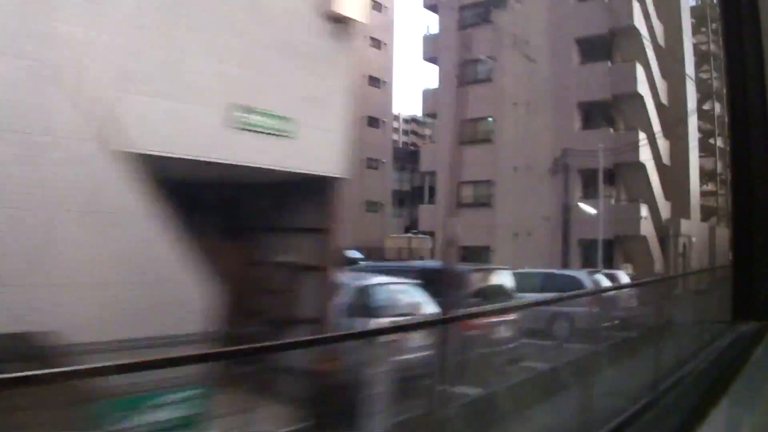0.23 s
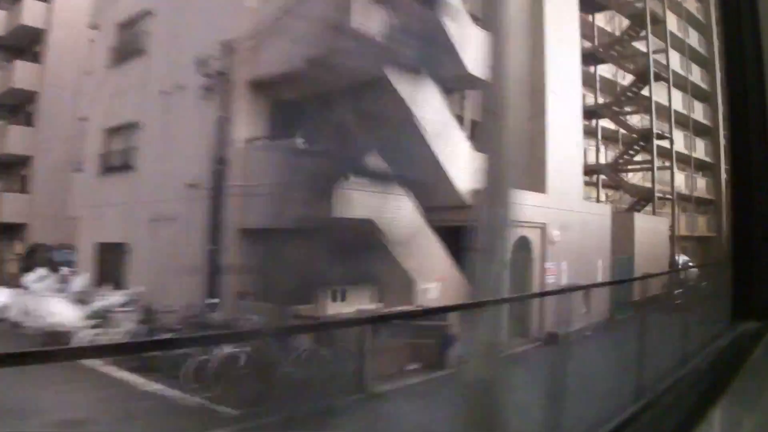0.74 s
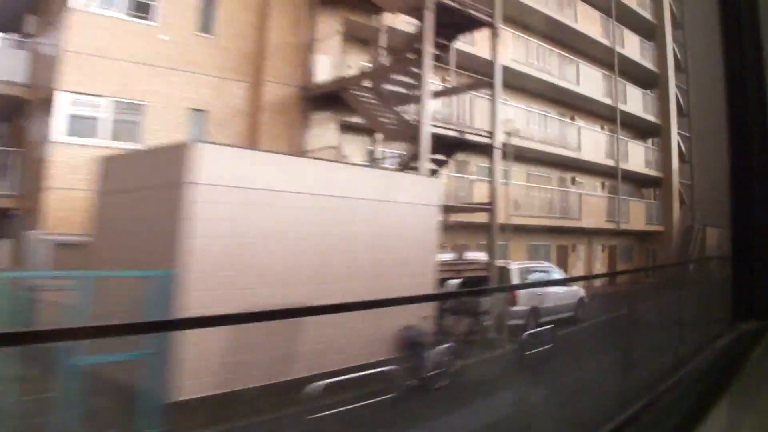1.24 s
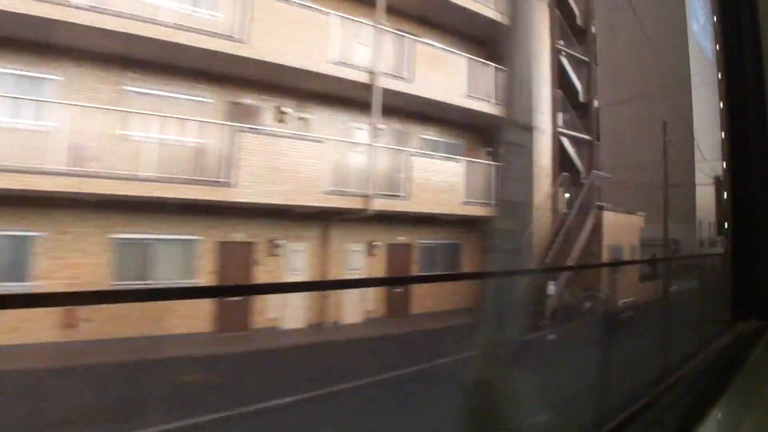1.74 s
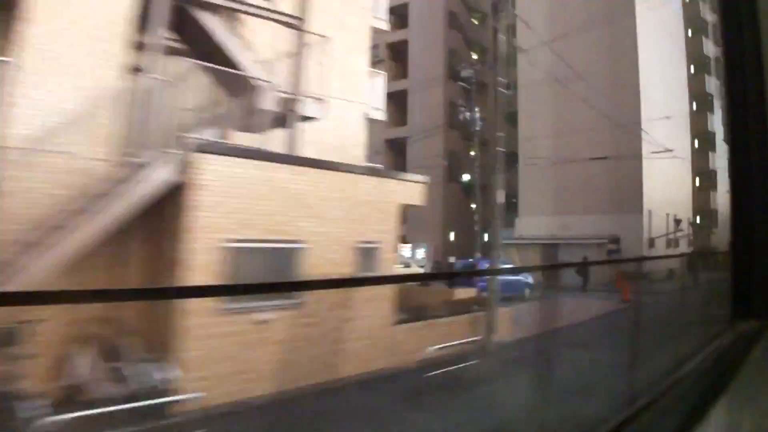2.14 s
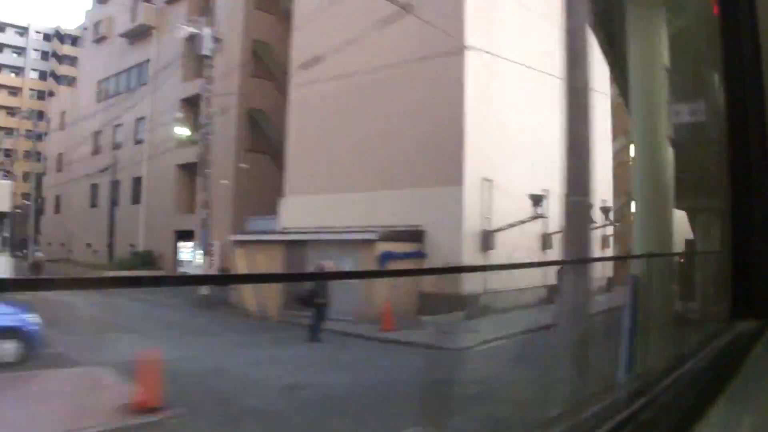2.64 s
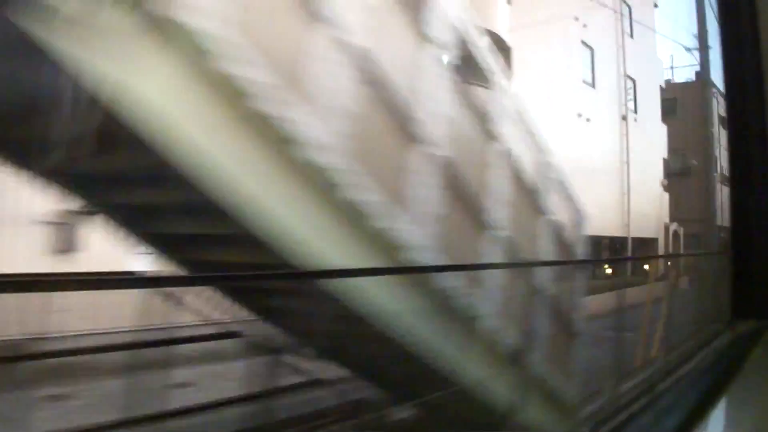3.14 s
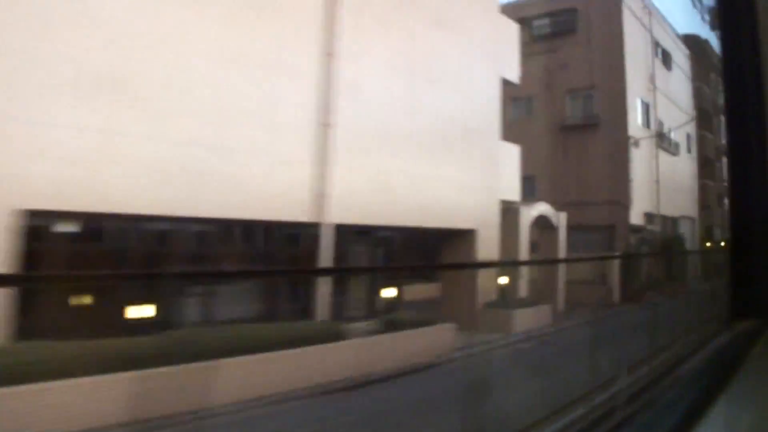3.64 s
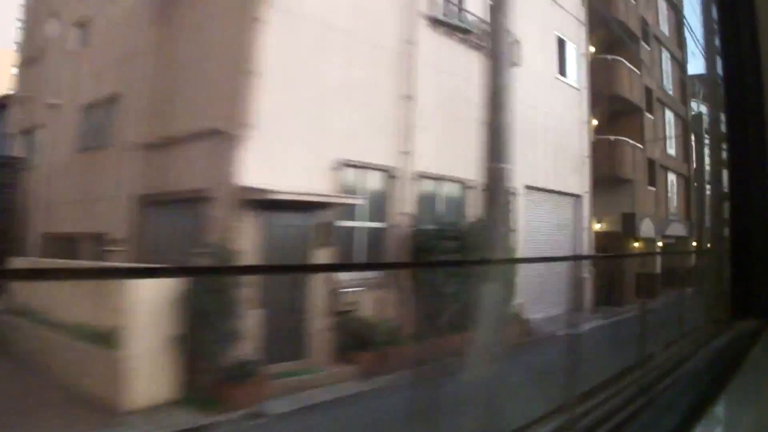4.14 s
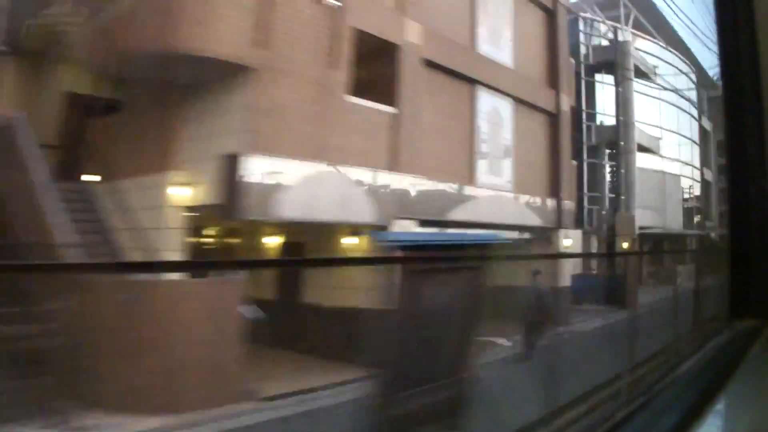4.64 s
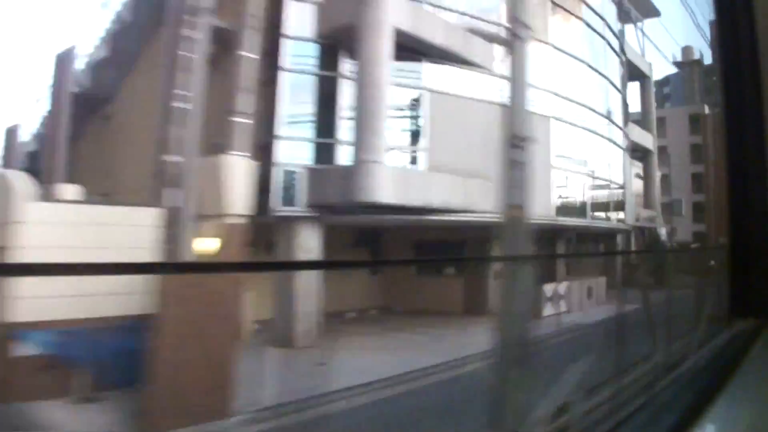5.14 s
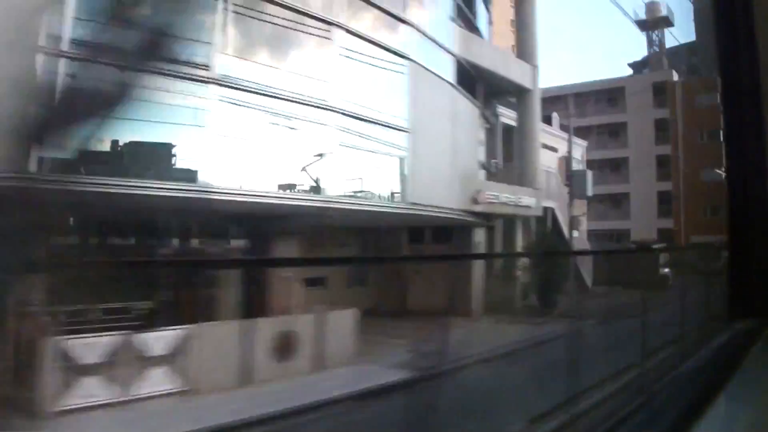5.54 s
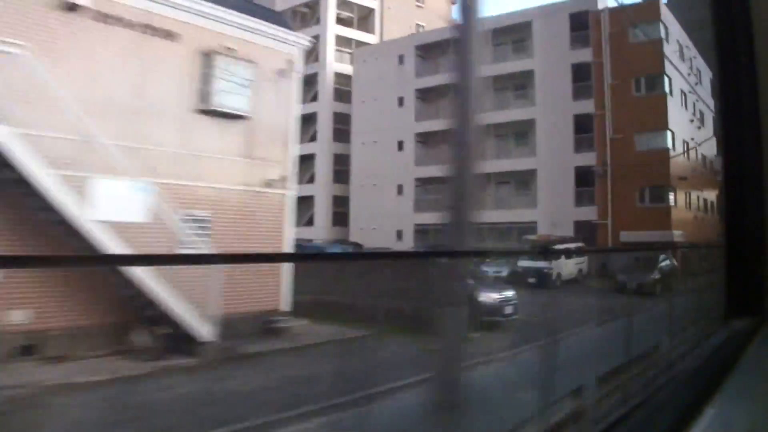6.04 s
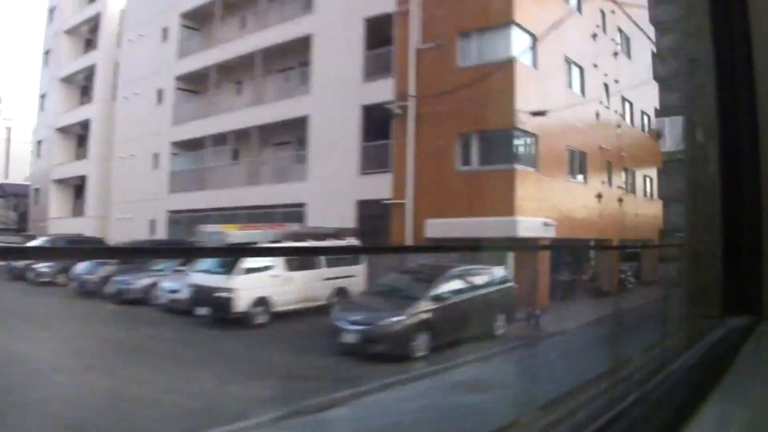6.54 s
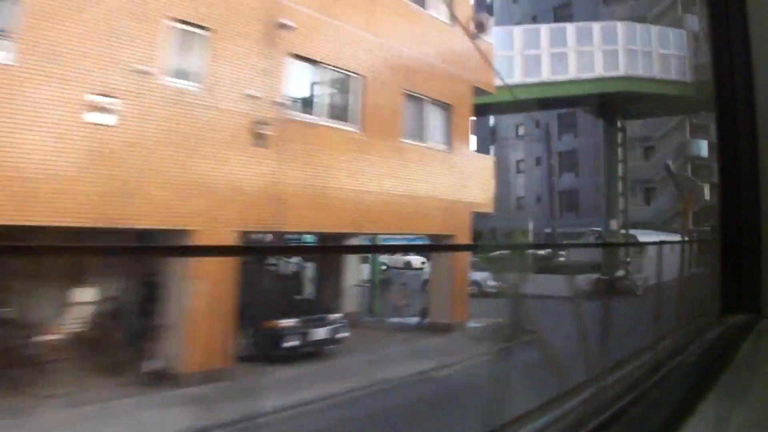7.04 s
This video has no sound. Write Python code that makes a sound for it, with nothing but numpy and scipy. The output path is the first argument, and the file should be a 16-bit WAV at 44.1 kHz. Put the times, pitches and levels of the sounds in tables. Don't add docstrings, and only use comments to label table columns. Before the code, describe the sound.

Heard inside an electric train car by a stereo microphone at the window: a deep continuous wheel rumble with a low wavering motor hum and faint air hiss. Soft, dull rail-joint knocks pass underneath. After about six seconds the roar grows, loose trim and a door latch rattle, and heavy blows ring the floor just before the end.

```python
import sys
import numpy as np
from scipy import signal
from scipy.fft import rfft, irfft, next_fast_len
from scipy.io import wavfile
from scipy.ndimage import uniform_filter1d

SR = 44100
rng = np.random.default_rng(int(sys.argv[2]) if len(sys.argv) > 2 else 0)


def decibels_to_gain(level_db):
    exponent = np.asarray(level_db, float) / 20
    return 10 ** exponent


def materialize(psi):
    bounded = np.clip(np.atleast_2d(psi).T, -1, 1)
    quanta = np.round(bounded * 32767).astype(np.int16)
    wavfile.write(sys.argv[1], SR, quanta)


N = 321489
TIME = np.arange(N) / SR
SIDES = np.array([[.5], [-.5]])  # left, right; times a left-minus-right dB

# f/Hz, side minus mid/dB
WIDTH_DB = [(20, -6.5), (90, -5), (140, -6.5), (250, -4.5), (500, -9.5), (1200, -8.5), (2000, -7.5),
            (3500, -2), (8000, -0.5)]
# f/Hz, left minus right/dB
BALANCE_DB = [(20, -2.5), (100, -1.5), (250, -0.5), (450, -0.5), (900, -2), (2000, 1.5), (4000, 0),
              (8000, -0.5)]
# f/Hz, density/dB
AIR_DB = [(2500, -15.5), (4500, -5), (7000, -3), (10000, -3), (13000, -5.5), (16000, -9.5)]
# t/s, peak level/dB, half length/s
RUSTLE = [(.08, -76, 0.03), (.9, -89.5, 0.042), (1.9, -83, 0.043), (2.8, -72, .08), (3.65, -76.5, 0.053),
          (4.15, -77, .08), (4.38, -75, .045), (4.7, -78.5, 0.065), (4.9, -76.5, .05), (5.35, -82.5, 0.087),
          (5.71, -70, 0.035), (5.78, -66, 0.045), (5.85, -72.5, .025), (6.0, -72, 0.07), (6.32, -72, 0.05),
          (6.7, -73.5, .045), (7.21, -71.5, 0.059)]
# t/s, level/dB, f/Hz, t60/s
FRAME = [(1.12, -47, 10530, 0.013), (1.847, -53.5, 10000, .012), (1.902, -58.5, 10500, 0.012),
         (1.921, -61.5, 10500, .012), (2.292, -53.5, 10950, .013), (5.569, -56, 11000, .012),
         (5.69, -57, 10070, .025), (6.045, -62, 10600, .05), (6.21, -63, 7970, .033),
         (6.701, -46, 10480, 0.027), (7.246, -61.5, 10000, 0.017), (7.26, -65.5, 12100, .015)]
# t/s, level/dB, f/Hz, t60/s
STRAP = [(2.803, -61, 7050, .02), (5.794, -60, 10000, 0.033), (5.804, -51.5, 9500, .04),
         (6.706, -52.5, 9460, 0.088), (6.722, -55, 10500, .06), (6.54, -59, 11000, 0.02),
         (6.327, -42, 8020, 0.067), (6.335, -52.5, 8520, .09), (6.346, -56, 9500, .07),
         (6.945, -61, 7470, 0.18), (7.097, -42.5, 8510, 0.027), (7.109, -47, 10000, .03)]
# t/s, level/dB, f/Hz, t60/s
TONGUE = [(5.803, -42, 4650, .03), (6.533, -56, 4300, .045), (6.65, -55, 4350, .045),
          (6.708, -57, 3900, .03), (6.717, -56, 4600, .03), (6.328, -49, 9200, .03),
          (6.34, -54, 10000, .05), (5.805, -55, 10000, .03), (5.998, -54, 6100, .05),
          (5.998, -53, 7300, .04), (6.652, -58, 6000, .04), (6.72, -57, 6500, .04), (7.098, -50, 8600, .03),
          (6.701, -52, 12800, .02), (4.953, -60, 3750, .04)]
# t/s, level/dB, f/Hz, t60/s
DOOR = [(5.769, -54.5, 2200, .04), (5.804, -44.5, 2600, .035), (5.997, -51.5, 2800, 0.039),
        (6.122, -52.5, 1810, .04), (6.246, -52, 1900, .04), (6.275, -52, 2000, .04),
        (6.324, -47, 2400, .05), (6.54, -55.5, 2400, .04), (6.65, -55, 2794, 0.036),
        (6.831, -51, 1810, .06), (7.085, -52.5, 2000, .04), (7.104, -47.5, 2200, .05),
        (7.172, -52, 2000, .04)]
# t/s, level/dB, f/Hz, t60/s
LATCH = [(4.953, -55, 5300, 0.055), (5.652, -66, 5400, 0.03), (5.765, -59, 8400, .07),
         (5.803, -54, 4200, 0.03), (5.85, -53.5, 9500, 0.06), (5.997, -48, 6500, 0.04),
         (6.533, -55, 5000, 0.048), (6.65, -53.5, 5000, 0.054), (6.708, -54, 5530, 0.1),
         (6.755, -60.5, 4500, 0.036), (7.068, -59, 5430, 0.036)]
# f/Hz, width/Hz, level/dB
LATCH_RINGS = [(4430, 230, 7), (4760, 210, 2), (6040, 135, 0), (6640, 125, 0), (6990, 105, -1)]
# t/s, length/s, f/Hz, wobble/Hz, level/dB
SQUEAKS = [(1.871, .024, 9600, 80, -61), (1.869, 0.026, 11800, 60, -69), (2.135, 0.024, 11800, 60, -74),
           (2.328, 0.13, 1076, 27, -48), (3.838, 0.086, 1650, 45, -52), (4.335, .1, 4450, 6, -71),
           (4.36, .07, 4690, 12, -75), (4.46, .06, 4430, 12, -78), (1.348, .04, 3450, 15, -71),
           (1.361, .03, 3790, 15, -73), (4.952, .018, 3740, 60, -66), (4.72, .085, 8608, 10, -78),
           (4.824, .125, 8608, 10, -69), (4.70, .15, 15385, 25, -75), (4.893, .075, 15385, 10, -76),
           (7.172, .018, 9000, 150, -64), (7.188, .03, 8500, 150, -64), (7.212, .035, 9000, 200, -65),
           (7.175, .02, 12300, 150, -70), (1.845, .015, 6900, 60, -70)]
# t/s, rate/Hz
SHAFT_HZ = [
    (0, 77.84),
    (3.5, 77.48),
    (7.29, 77.0),
]
# order, level/dB, left minus right/dB, second motor share/1,
# time of cancellation left/s, right/s
SHAFT_ORDERS = [(1, -35, 5.5, 0.25, 1.4, 0.4), (2, -39, 0.5, 0.79, 1.2, 1.5),
                (4, -44.5, 3.5, 0.34, 0.3, 0.3), (5, -48.5, -5, 0.69, 2.5, 1.3),
                (6, -55.5, 2.5, 0.2, 2.4, 5.4), (7, -43, 1.5, 0.69, 1.93, 2.25)]
# t/s, slot tone level/dB, third harmonic level/dB
SLOT_DB = [(0, -76.5, -92.5), (.25, -76, -90), (.6, -68.5, -93), (.78, -72, -93), (.9, -81, -92),
           (1.2, -79, -92), (1.42, -72.5, -92), (1.6, -76, -92.5), (1.72, -85, -93), (1.95, -78, -95),
           (2.8, -79, -98), (4.4, -76.5, -99), (4.62, -73, -94), (4.8, -87, -88), (5.7, -79, -88),
           (6, -77.5, -96), (7.29, -79.5, -99.5)]
# t/s, level/dB
MESH_DB = [(0, 2.5), (.5, -0.5), (1, -0.5), (1.4, -2), (1.6, 3), (1.75, -0.5), (2.2, -2), (2.42, -6),
           (2.65, 1.5), (3.1, -2), (3.5, 2), (3.9, 2), (4.15, -5.5), (4.5, 3), (4.78, -4.5), (5.1, 1.5),
           (6.1, -0.5), (7.29, 4)]
# t/s, peak level/dB, half length/s
HUM_SWELLS = [(0, -25, 0.041), (.43, -23, 0.22), (1.5, -30.5, 0.46), (1.98, -26, 0.16),
              (2.38, -21.5, 0.055), (2.64, -26, 0.087), (3.37, -25.5, 0.12), (3.64, -30, 0.043),
              (4.02, -26.5, 0.066), (4.44, -21.5, .1), (4.64, -27, 0.1), (4.85, -26, 0.057),
              (5.12, -22.5, 0.071), (5.5, -28, 0.096), (5.85, -25.5, 0.17), (6.08, -17.5, 0.022),
              (6.51, -13.5, 0.043), (6.65, -21.5, 0.071), (7.07, -15, 0.055), (7.25, -23, 0.094)]
# t/s, peak level/dB, half length/s
PANEL_SWELLS = [(0, -40, 0.018), (.5, -43, .1), (.72, -28, 0.0094), (.97, -42.5, 0.11), (1.13, -27, 0.015),
                (1.28, -26, 0.015), (1.43, -30, 0.046), (1.55, -27, 0.067), (1.83, -25.5, 0.077),
                (2.24, -34, 0.087), (2.55, -32.5, 0.057), (2.71, -26, 0.055), (3.17, -32, 0.062),
                (3.51, -28.5, 0.032), (3.66, -31.5, 0.044), (4.24, -27, 0.071), (4.7, -39, 0.11),
                (4.97, -31.5, 0.049), (5.46, -27.5, 0.056), (5.81, -27.5, 0.051), (6.15, -31.5, 0.061),
                (6.29, -31.5, 0.067), (6.49, -31.5, 0.054), (6.6, -24, 0.026), (6.83, -28, 0.028),
                (7.17, -35, 0.091)]
# t/s, level/dB, centre f/Hz, width/octaves,
# t60/s
JOINTS = [(.07, -31.5, 401.5, 0.23, 0.36), (.83, -35, 300.5, 1.5, 0.25), (1.53, -32.5, 305, 1.8, 0.12),
          (2.29, -28, 350, 0.82, 0.45), (2.8, -27.5, 257, 0.85, 0.31), (2.7, -65, 4200, 1.2, .45),
          (2.8, -63.5, 4200, 1.2, .4), (3.17, -26.5, 151, 0.46, .4), (3.12, -21, 256, 0.81, 0.46),
          (3.15, -37.5, 523, 0.36, 0.19), (3.33, -37, 287, 0.48, .3), (3.99, -32, 353, 0.59, 0.35),
          (4.769, -26.5, 331, 0.95, 0.18), (4.8, -26, 206, 0.16, 0.48), (6.27, -29, 189.4, 0.22, 0.49),
          (6.66, -28.5, 203.6, 0.24, 0.48), (6.85, -26.5, 303, .15, .4), (1.571, -36, 163, 0.18, .3),
          (3.97, -33, 250, .15, .3), (2.525, -36, 605, 0.81, .08), (6.615, -40, 554, 0.91, 0.093),
          (7.031, -30, 484, 0.79, 0.088), (5.47, -27.5, 375, 0.69, 0.49), (6.04, -28, 393, 0.24, 0.45),
          (6.386, -34, 500, 0.5, 0.2), (6.795, -32.5, 475, 1.5, 0.28), (7.087, -17.5, 294.5, 0.93, 0.27),
          (7.10, -26, 572, 0.41, .4), (7.122, -25, 271, 0.35, 0.45), (7.26, -30.5, 219.5, 1.2, 0.18)]
# t/s, level/dB, f/Hz,
# t60/s
BLOWS = [
    (6.386, -24, 539, .25),
    (7.022, -11, 48, .08),
    (7.097, -7, 295, .1),
    (7.095, -24, 548, .3),
    (7.1, -20, 352, .25),
    (7.131, -10, 280, .12),
    (7.2868, -6.5, 105, .1),
]
# f/Hz, density/dB per Hz
CAR_DB = [(5, -0.5), (13, 4.5), (33, -0.5), (70, -0.5), (150, -6.5), (270, -13), (420, -17), (510, -22.5),
          (640, -23.5), (780, -27.5), (1000, -31), (2000, -36.5), (2500, -45), (3200, -49), (4000, -54.6),
          (6300, -64.6), (10000, -75.5)]
# t/s, level over plain line/dB
TRACK_DB = [(0, 0), (.1, 1), (.6, -0.5), (1.4, -0.5), (1.6, 1.5), (2.2, 0), (2.9, 0), (3.2, 2.5), (3.6, 0),
            (4.5, -0.5), (4.85, 0.5), (5.35, 0), (5.95, 2.5), (6.1, 5.5), (6.4, 6.5), (6.9, 7), (7.11, 6),
            (7.29, 6.5)]
# t/s, level over steady sway/dB, half length/s
LURCHES = [(.12, 0, 0.023), (1.38, 0.5, .06), (2.31, -4, 0.13), (2.85, 4, 0.086), (3.33, 10, 0.058),
           (4.61, -14.5, 0.025), (5.16, 5, 0.033), (5.93, 2, 0.16), (6.06, 9.5, 0.023), (6.36, 1.5, 0.052),
           (6.62, 1.5, 0.081), (7.0, 0, 0.059), (7.2, -19, 0.04)]
REGISTER_HZ = [
    25,
    130,
    400,
    1500,
]
REGISTER_FEELS = [
    1.02,
    0.53,
    1.44,
    0.17,
]


def unit(x):
    return x / np.sqrt(np.mean(x ** 2))


def over_time(table):
    s, *columns = np.transpose(table)
    return np.array([np.interp(TIME, s, c) for c in columns])


def over_hz(table, hz):
    table_hz, db = np.transpose(table)
    return np.interp(np.log(hz), np.log(table_hz), db)


def walk(rate_hz):
    hold = int(SR / rate_hz)
    steps = np.repeat(rng.standard_normal(N // hold + 1), hold)
    return unit(uniform_filter1d(uniform_filter1d(steps, hold), hold)[:N])


def swells(rows):
    return sum(decibels_to_gain(db) * np.exp(-.5 * ((TIME - s) / half_s) ** 2) for s, db, half_s in rows)


def tone(hz):
    return np.sin(2 * np.pi * np.cumsum(hz) / SR)


def field(spectrum, level_db, flicker_db, rate_hz):
    size = next_fast_len(N)
    hz = np.maximum(np.arange(size // 2 + 1) * SR / size, 1)
    mid, side = rfft(rng.standard_normal((2, size))) * decibels_to_gain(over_hz(spectrum, hz))
    side = side * decibels_to_gain(over_hz(WIDTH_DB, hz))
    pair = np.array([mid + side, mid - side]) * decibels_to_gain(SIDES * over_hz(BALANCE_DB, hz))
    low_hz, high_hz = spectrum[0][0], spectrum[-1][0]
    out = 0
    for centre_hz in 2 ** np.arange(np.log2(low_hz), np.log2(high_hz) + .5, .5):
        share = np.clip(1 - 2 * abs(np.log2(hz / centre_hz)), 0, 1)
        gain = decibels_to_gain(level_db(centre_hz) + flicker_db * walk(rate_hz))
        out = out + irfft(pair * share, size)[:, :N] * gain
    return out


def burst(s, db, hz, octaves, t60_s, pan_db, rise_s, alike, order=2):
    t = np.arange(int(t60_s * SR) + 64) / SR
    edges_hz = np.minimum(hz * 2 ** (np.array([-.5, .5]) * octaves), [15000, 20000])
    band = signal.butter(order, edges_hz, "band", fs=SR, output="sos")
    mid, side = signal.sosfilt(band, rng.standard_normal((2, SR // 2)))[:, :len(t)]
    pair = unit(mid + 2 * SIDES * (1 - alike) * side)
    shape = (1 - np.exp(-t / rise_s)) * 1000 ** (-t / t60_s)
    knock = pair * shape * decibels_to_gain(db + SIDES * pan_db)
    return np.pad(knock, ((0, 0), (int(s * SR), N)))[:, :N]


def air():
    hiss = unit(field(AIR_DB, lambda hz: 0, flicker_db=0.7, rate_hz=26))
    steady = hiss * decibels_to_gain(-77.5 + 0.49 * over_time(TRACK_DB)[0])
    dull = signal.lfilter(*signal.butter(1, 7100, fs=SR), hiss)
    cloth = dull * swells(RUSTLE) * decibels_to_gain(4 + 2.0 * walk(50))
    return decibels_to_gain(5.0) * (steady + cloth)


def rattle(ticks, octaves, pan_db, order, alike):
    return sum(burst(s, db, hz, octaves, t60_s, pan_db, 0.028 * t60_s, alike, order)
               for s, db, hz, t60_s in ticks)


def squeaks():
    out = 0
    for s, length_s, hz, wobble_hz, db in SQUEAKS:
        gate = np.clip(np.minimum(TIME - s, s + length_s - TIME) / (0.19 * length_s), 0, 1)
        out = out + gate * decibels_to_gain(db + 3.2 * walk(60)) * tone(hz + wobble_hz * walk(60))
    return out


def trim():
    out = rattle(FRAME, octaves=.6, pan_db=7.5, order=1, alike=.15)
    out = out + rattle(STRAP, octaves=.9, pan_db=2.5, order=1, alike=.1)
    out = out + rattle(TONGUE, octaves=.1, pan_db=-3, order=2, alike=.7)
    out = out + rattle(DOOR, octaves=1.2, pan_db=1.5, order=2, alike=.55)
    latch = rattle(LATCH, octaves=1.3, pan_db=-9, order=2, alike=.45)
    out = out + latch
    for hz, width_hz, db in LATCH_RINGS:
        out = out + decibels_to_gain(db) * signal.lfilter(*signal.iirpeak(hz, hz / width_hz, SR), latch)
    return out + squeaks()


def motors():
    slip_hz, mesh_order = 0.054, 7
    turns = np.cumsum(over_time(SHAFT_HZ)[0] + 0.038 * walk(3)) / SR
    inverter = decibels_to_gain(-61.5 + 1.4 * walk(15)) * np.sin(2 * np.pi * 1281.5 * TIME)
    slot_db = over_time(SLOT_DB) + np.array([1.5 * walk(5.9), 4.0 * walk(25)])
    slot_turns = turns + np.cumsum(.025 * walk(9)) / SR
    slot_orders = np.array([[48], [144]])
    slots = np.sum(decibels_to_gain(slot_db) * np.sin(2 * np.pi * slot_orders * slot_turns), axis=0)
    out = inverter + slots
    second_gain = decibels_to_gain(-17.5 / (1 + np.exp((4.8 - TIME) / 0.37)))
    for order, db, pan_db, share, *cancel_s in SHAFT_ORDERS:
        order = round(order)
        first = 2 * np.pi * (order * turns + rng.random())
        behind = 2 * np.pi * order * slip_hz * (TIME - np.array(cancel_s)[:, None])
        mesh_db = 1.5 * walk(12) + over_time(MESH_DB)[0] * (order == mesh_order)
        both = np.sin(first) - share * second_gain * np.sin(first - behind)
        out = out + decibels_to_gain(db + mesh_db + SIDES * pan_db) * both
    return np.sqrt(2) * out


def drone(table, hz, wander_hz, pan_db, lag_rad):
    phase = 2 * np.pi * np.cumsum(hz + wander_hz * walk(6)) / SR
    level = (swells(table) + decibels_to_gain(-39)) * decibels_to_gain(SIDES * pan_db - 3.5)
    return np.sqrt(2) * level * np.sin(phase + SIDES * lag_rad)


def blower():
    return drone(HUM_SWELLS, hz=58.2, wander_hz=1.228, pan_db=-4.5, lag_rad=0.15)


def panel():
    return drone(PANEL_SWELLS, hz=224.5, wander_hz=1.792, pan_db=-5.0, lag_rad=-0.41)


def joints():
    out = 0
    for s, db, hz, t60_s in BLOWS:
        t = np.maximum(TIME - s, 0)
        shape = (1 - np.exp(-t / .0012)) * 1000 ** (-t / t60_s)
        out = out + decibels_to_gain(db + SIDES * -3) * shape * np.sin(2 * np.pi * hz * t)
    for s, db, hz, octaves, t60_s in JOINTS:
        out = out + burst(s, db + 2.5, hz, octaves, t60_s, pan_db=-1.2, rise_s=0.0091, alike=0.63)
    return out


def rolling():
    jolt_share = [0.21, 0.22, 0.58, 0.064]
    jolt_s, jolt_lag_s, jolt_top = 0.043, 0.064, 2
    jolt = swells([(s + jolt_lag_s, db + 20, jolt_s) for s, db, *_ in JOINTS])
    jolt = jolt_top * np.tanh(jolt / jolt_top)
    register_db = np.outer(REGISTER_FEELS, over_time(TRACK_DB)[0])
    register_db += 20 * np.log10(1 + np.outer(jolt_share, jolt))
    register_db[0] += 20 * np.log10(decibels_to_gain(-2.0) + swells(LURCHES) * decibels_to_gain(-6.0))

    def level_db(hz):
        place = np.interp(np.log(hz), np.log(REGISTER_HZ), range(len(REGISTER_HZ)))
        return sum(max(0, 1 - abs(place - k)) * db for k, db in enumerate(register_db))

    sound = field(CAR_DB, level_db, flicker_db=.5, rate_hz=15)
    plain_line_rms = np.sqrt(np.mean(sound[:, :N // 2] ** 2))
    return decibels_to_gain(-22) * sound / plain_line_rms


def scene():
    return air() + trim() + motors() + blower() + panel() + joints() + rolling()


def top_cut(x):
    return signal.sosfilt(signal.butter(12, 15790, fs=SR, output="sos"), x)


def record(dry):
    return top_cut(dry)


dry = scene()
out = record(dry)
materialize(out)
```